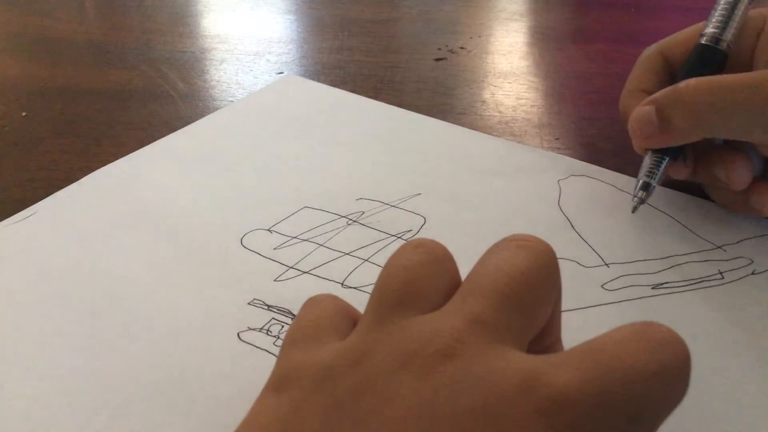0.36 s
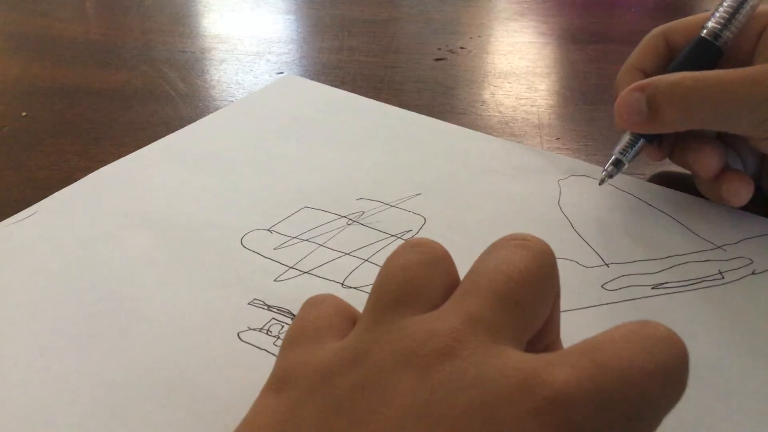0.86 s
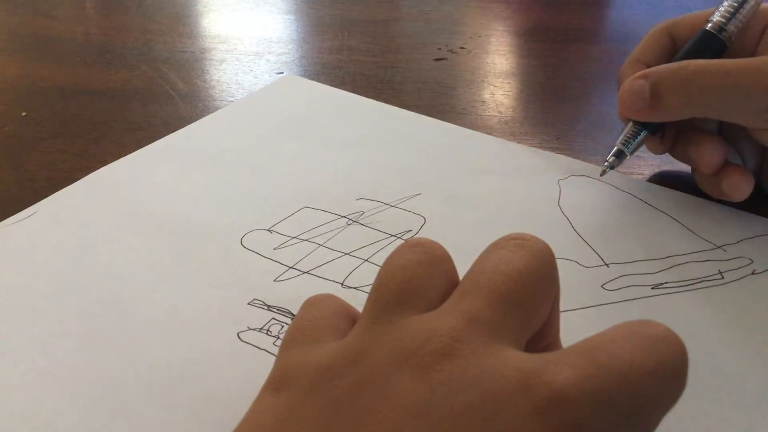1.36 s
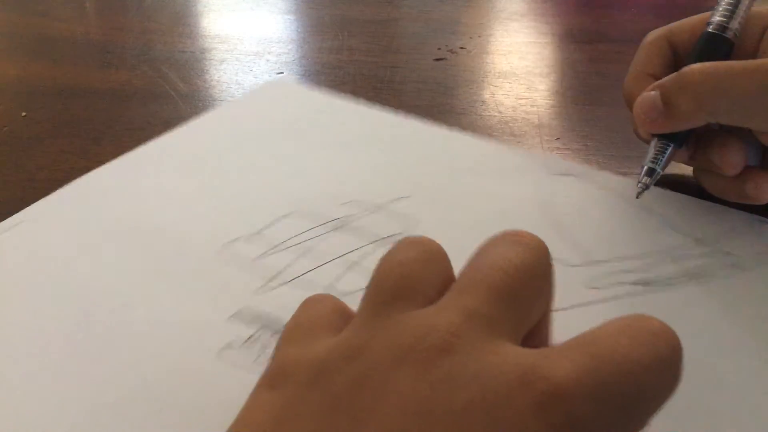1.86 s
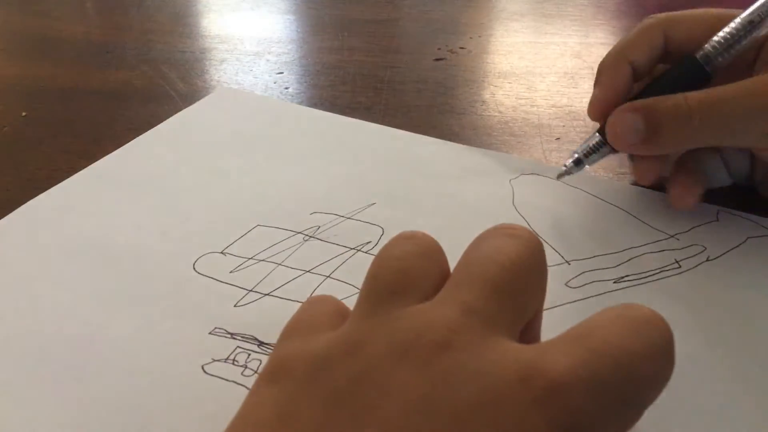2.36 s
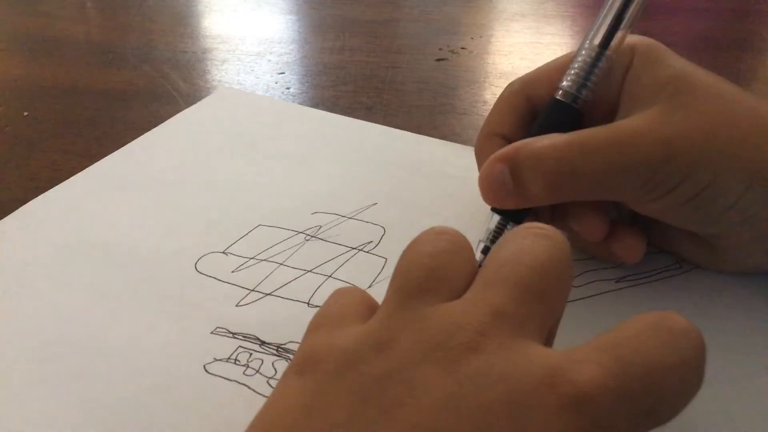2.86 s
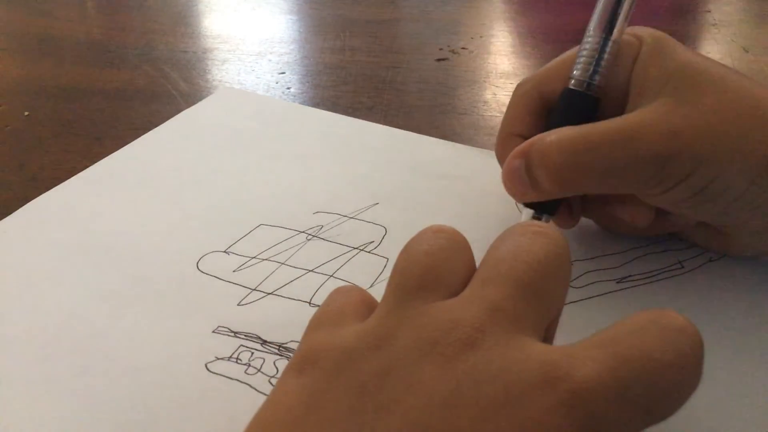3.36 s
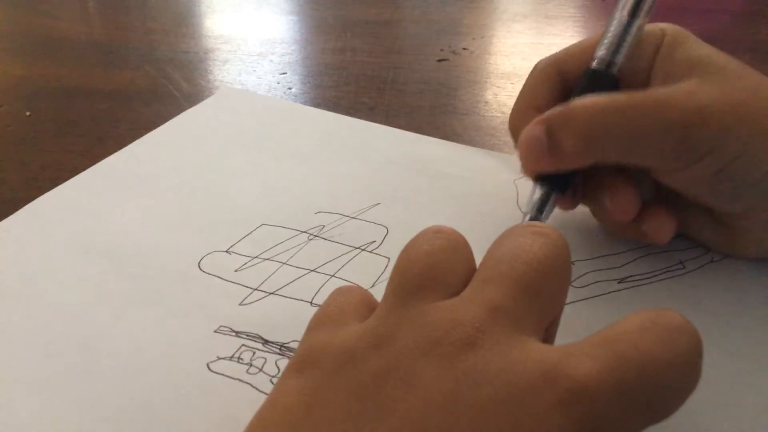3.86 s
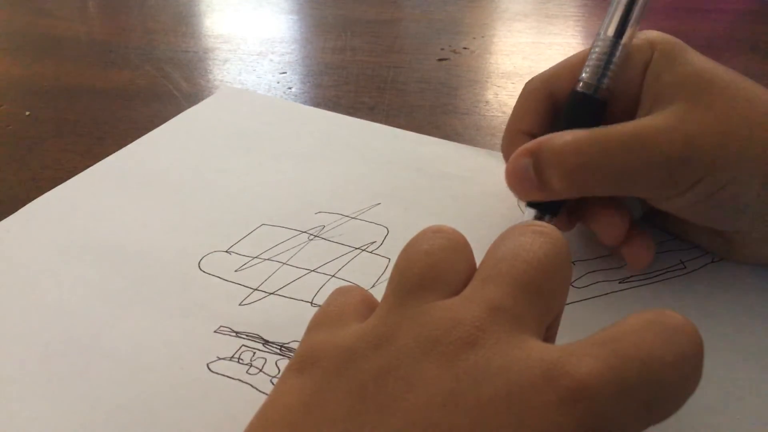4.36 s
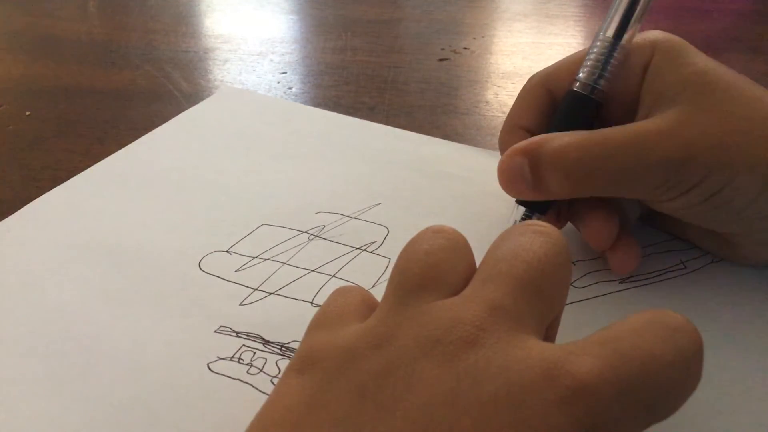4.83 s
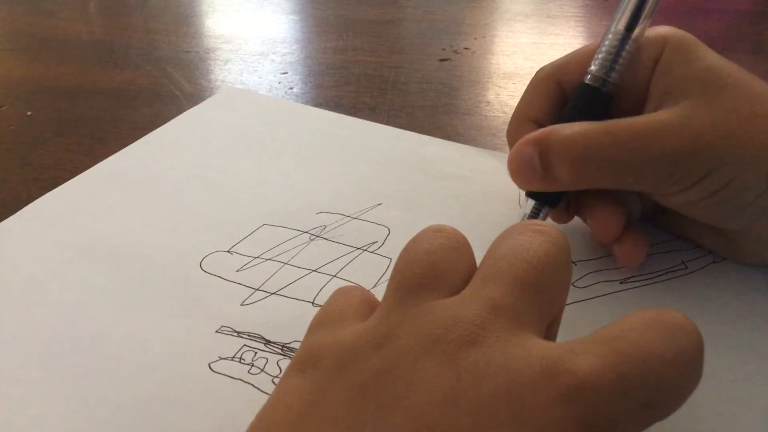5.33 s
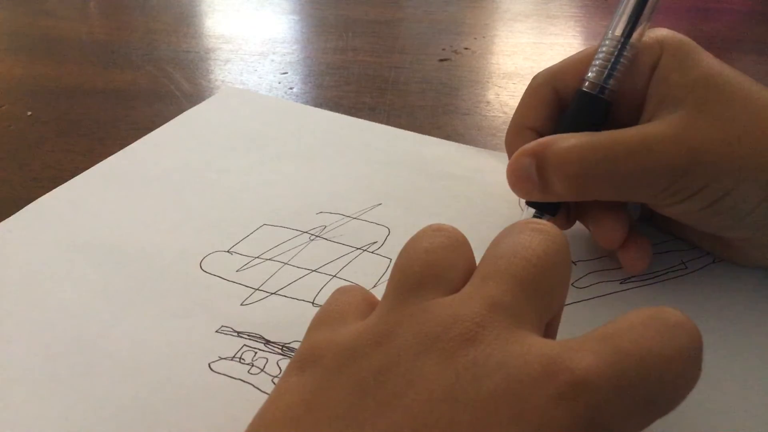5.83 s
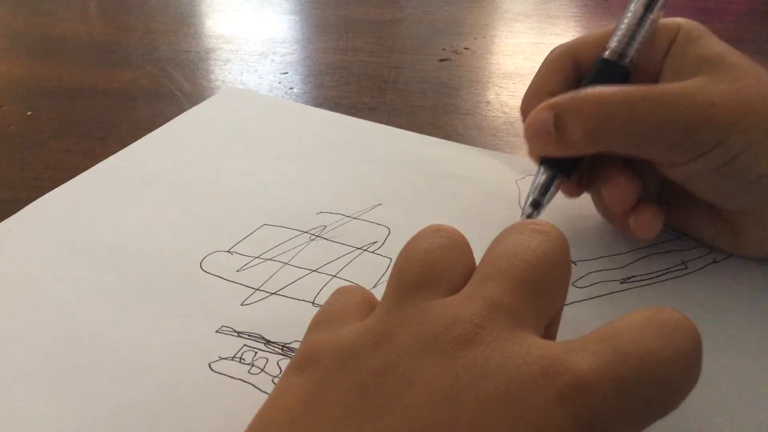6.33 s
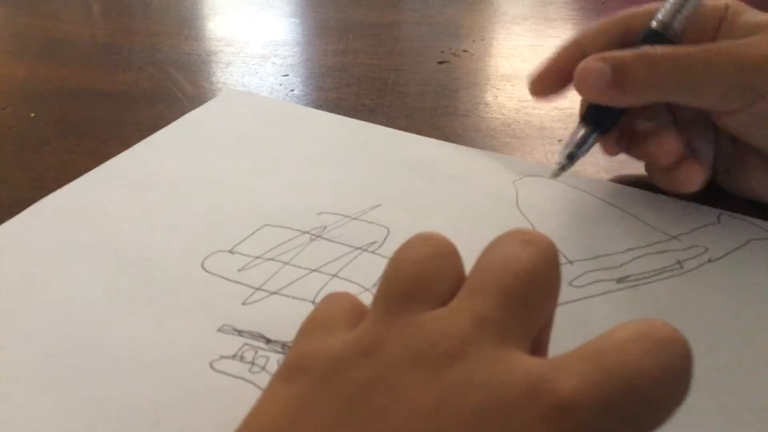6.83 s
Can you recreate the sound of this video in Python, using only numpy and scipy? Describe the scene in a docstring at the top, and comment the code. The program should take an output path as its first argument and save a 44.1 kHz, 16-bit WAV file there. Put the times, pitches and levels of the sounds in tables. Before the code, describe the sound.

Dull table thuds and an echoing hard clatter give way to sparse paper crackles, ending in a rapid run of scratchy pen strokes over quiet hiss.

```python
"""A ballpoint pen draws on paper over a hard wooden table; its quick strokes chatter at the end, as slipping noise
coloured by the microphone port. Pen and hands tap and rub the table top: knocks and noise wake its low modes. Paper
scratches and crackles as grainy noise and short clicks. Something hard clatters across the room, with echoes.
Under the still air of the room, a small camera on the table hisses through its port and ticks ten times a second."""
import sys
import numpy as np
from scipy import signal
from scipy.fft import rfft, irfft, next_fast_len
from scipy.io import wavfile
from scipy.ndimage import map_coordinates

SR = 44100
rng = np.random.default_rng(int(sys.argv[2]) if len(sys.argv) > 2 else 0)


def master(y):
    """Save y as 16-bit WAV."""
    cut = np.clip(np.atleast_2d(y).T, -1, 1)
    pcm = np.round(cut * 32767)  # scale
    wavfile.write(sys.argv[1], SR, pcm.astype(np.int16))


def linear_from_db(decibels):
    """Turn decibels (scalar or array-like) into linear amplitude factors; 0 gives 1."""
    return 10 ** (np.asarray(decibels, float) / 20)


N = 317520  # length in samples
T = np.arange(N) / SR  # time in seconds

# ways the table top rings: f/Hz, level/dB, free time to die away by 60 dB/s
TABLE_MODES = [(61.65, 6, 0.56), (83, -14.5, 0.097), (123.2, 4.5, 0.18), (179.7, -3, 0.37), (229, 3.5, 0.3),
               (273.7, 4, 0.066), (298, 3.5, 0.11), (365, -22, 0.33), (417, -13, 0.16), (571, -8.5, 0.071)]
# taps on the table; the spot touched sets how the two lowest modes answer:
# t/s, level/dB, deepest mode/dB, second mode/dB, hardness/dB
TABLE_TAPS = [(0.024, -54, 2.5, 18, 6), (0.387, -39, -8, -1, -3.5), (0.684, -31, -8, -5, -16),
              (0.708, -21, -17, -25, -14.5), (0.727, -29, -13, -12, -7), (0.737, -21, -19, -7.5, -16),
              (0.769, -26.5, -18, -12, -26), (0.798, -39.5, -12, 12, -16), (0.955, -25.5, 2, -2, -20),
              (1.014, -30.5, 10.5, 23.5, -24), (1.269, -30, -3.5, -2.5, -1), (1.924, -35.5, -12, 5.5, -16),
              (1.949, -34, -11, -20, -25), (2.1, -47.5, -1, -16, 2), (2.313, -34.5, -1, 11, -4),
              (2.344, -43, -7, 24.5, -4), (2.601, -38.5, 11, 13, -12), (2.668, -44.5, -22, 0, -21),
              (2.769, -51, 12, 14.5, -2), (3.01, -48, -2, -14, 0), (3.102, -36, -3, -5, -2),
              (3.345, -53, 9, 23, -10), (3.567, -50, 11, 6, 5), (4.042, -48, -3, -7, -6),
              (4.209, -36, 2, -0.5, -1), (4.599, -61.5, 18, 22, 3), (4.852, -31.5, -2, -0.5, -0.5),
              (5.118, -35.5, 0, 2, -2.5), (5.545, -44.5, -7, -14, -5), (6.749, -47.5, 13, 10, -6),
              (6.863, -49, 3, 14, -4), (6.925, -43.5, 18, 13, -4), (6.997, -44, 17, 25.5, -9),
              (7.022, -44, 20, 22, -7), (7.105, -47, 23, 27, 3), (7.159, -42, 14, 23, -1)]
# the tap that follows each stroke: level against the stroke/dB, deepest mode/dB, second mode/dB, hardness/dB
STROKE_TAP = (-4.5, 5.5, 9, -7)
# hands rubbing the top: t/s, level/dB, lean towards the deepest mode/dB
HAND_RUBS = [(0.0, -66, 0), (0.14, -54, 3.5), (0.64, -57, -1), (0.74, -53, -14), (0.92, -56, -1),
             (1.06, -43.5, 5), (1.2, -57, 1.5), (1.38, -54.5, -1), (1.98, -60.5, 5), (2.19, -54, -5),
             (2.49, -54, 4.5), (2.69, -52.5, -9), (2.83, -69, 10), (3.05, -61, -0.5), (3.19, -55.5, 1),
             (3.59, -51.5, -2.5), (3.83, -53.5, 3), (4.11, -68, -4), (4.31, -55.5, -2), (5.21, -68.5, 6.5),
             (5.47, -62, 0), (5.73, -55, 1), (6.38, -57.5, 0.5), (6.8, -47, -2), (6.96, -44.5, -2),
             (7.2, -44.5, 3)]
# faint paper movement between the scrapes: t/s, scratch level/dB, hiss against the scratch/dB
PAPER_SLIDE = [(0, -60.5, -8.5), (0.4, -70, -4), (0.75, -67.5, -8.5), (1.1, -69.5, -0.5),
               (1.9, -69.5, -3.5), (2.4, -65.5, -6.5), (3, -71.5, -1), (3.4, -74, -4), (3.95, -74, -1),
               (5.5, -77, 1), (6.2, -74, -0.5), (6.6, -70, 0), (7.2, -69, -4.5)]
# longer scrapes, which swell and stop short:
# t/s, length/s, scratch level/dB, hiss against the scratch/dB, table level/dB
LONG_SCRAPES = [(0, 0.094, -65.5, -20, -63.5), (0.49, 0.097, -76, -20, -79), (0.647, 0.15, -68, -12, -49.5),
                (1.953, 0.077, -73, -4, -56.5), (2.486, 0.27, -69, -7.5, -57.5),
                (3.245, 0.13, -58.5, -13.5, -63), (3.502, 0.18, -69.5, -6, -65.5),
                (4.236, 0.27, -71.5, -11.5, -56), (6.973, 0.07, -69.5, -10, -50.5)]
# lower colour of the dragged paper: f/Hz, level per Hz/dB
SCRATCH_COLOUR = [(240, -25), (400, -2), (454, -3.5), (930, -15), (1050, -10.5), (1280, -12), (2010, -30.5),
                  (3500, -42), (4550, -64), (7700, -120)]
# bright hiss of the paper fibres: f/Hz, level per Hz/dB
FIBRE_COLOUR = [(1200, -7), (2000, -7.5), (3150, -4.5), (4100, -12), (6000, -12), (8000, -13),
                (11500, -10.5), (14000, -26), (17000, -45)]
# the clearest paper crackles: t/s, level/dB
CLEAR_CRACKLES = [(2.015, -56), (2.5223, -49), (2.594, -49.5), (3.112, -53), (3.2104, -53), (3.269, -52),
                  (3.4271, -52), (3.535, -52), (3.5544, -54), (3.6326, -56), (3.8037, -55), (4.37, -57),
                  (4.4605, -58), (4.8906, -57), (6.8148, -52), (6.843, -48), (7.0093, -42), (7.0379, -55),
                  (7.069, -51)]
# still air of the room: f/Hz, level per Hz/dB
AIR_COLOUR = [(88, -37), (150, -2), (362, 2.5), (421, -19), (655, -6), (825, -23.5), (1860, -48.5),
              (2400, -36), (3120, -42), (5280, -120)]
# camera hiss with the resonances of the microphone port: f/Hz, level per Hz/dB
HISS_COLOUR = [(1180, -44), (2000, -8), (2260, -39), (2400, 1), (2880, 4), (3640, -13.5), (4110, -12),
               (4690, -6), (7170, -27.5), (9480, 2.5), (10200, -35), (11300, 1.5), (12800, -19),
               (14000, -2.5), (16000, -12)]
# hard knocks, far ones with much echo: t/s, level/dB, thud/dB, snap/dB, echo/dB
HARD_KNOCKS = [(1.2495, -42, 11, 6.5, 5), (1.2676, -31, 10.5, 7.5, -6.5), (1.2919, -35.5, 1, 5, -2),
               (1.313, -40, 0, 2.5, -7), (1.372, -32.5, -1, -12, -7.5), (1.3875, -43.5, -6, -19, -3),
               (1.439, -50.5, 10.5, -11, 0), (1.579, -49.5, 9, -4.5, 2), (1.5922, -37, 0.5, -34, -10),
               (1.6774, -36.5, -4.5, -14, -6.5), (1.711, -54, -8, 4, -5), (1.768, -50.5, 8, -28, -5.5),
               (2.2731, -46.5, -11, -1, -24), (2.3144, -48, 13, -23, 1.5), (2.3297, -35.5, 9.5, -32, -26),
               (2.489, -51, 4, -14, -19), (2.595, -47.5, 1, -4, -12), (4.03, -58, 12, 1.5, -4)]
# resonant colour of the hard knocks, as the microphone port hears them: f/Hz, width/Hz, level/dB
KNOCK_RESONANCES = [(255, 110, -3), (408, 54, -2), (564, 88, 2), (744, 370, -5), (1150, 150, -1),
                    (1505, 180, -7.5), (1756, 64, -5), (2450, 370, -8.5), (3120, 267, -8.5),
                    (3860, 590, -25.5), (5070, 860, -25.5), (6250, 1100, -34.5)]
# the room's echo: f/Hz, time to die away by 60 dB/s
ROOM_DECAY = [(200, 0.61), (1000, 0.74), (3000, 0.69), (8000, 0.6)]
# quick pen strokes: t/s, level/dB, length/s
PEN_STROKES = [(5.614, -58.5, 0.034), (5.656, -53.5, 0.014), (5.697, -52, 0.018), (5.734, -53.5, 0.035),
               (5.792, -47, 0.026), (5.866, -49, 0.031), (5.9444, -47.5, 0.032), (5.9725, -59.5, 0.079),
               (6.019, -48, 0.067), (6.104, -51, 0.037), (6.123, -56, 0.037), (6.19, -48, 0.045),
               (6.2676, -46, 0.048), (6.3583, -46, 0.047), (6.438, -48, 0.062), (6.543, -46.5, 0.047),
               (6.6368, -47.5, 0.056), (6.738, -46, 0.046), (6.8135, -41.5, 0.051), (6.9136, -45, 0.061),
               (6.9866, -47.5, 0.062), (7.092, -43.5, 0.043), (7.1413, -48, 0.035), (7.176, -45.5, 0.022)]
# resonant colour of the stroke noise at the microphone port: f/Hz, width/Hz, level/dB
STROKE_RESONANCES = [(600.4, 29, -7), (1143, 47, 2.5), (1332, 109, -4), (1788, 57, -12.5),
                     (2250, 370, -21.5), (3090, 130, -13.5)]


def unit(x):
    """Scales a sound to an rms (average strength) of 1."""
    return x / np.sqrt(np.mean(x ** 2) + 1e-20)


def along(points, hz):
    """Reads a curve of (Hz, value) points, with pitch on a log axis."""
    f, v = np.transpose(points)
    return np.interp(np.log(hz + 1), np.log(f + 1), v)


def curves(rows):
    """Draws one value per sample for each column after the time."""
    s, *columns = np.transpose(rows)
    return [np.interp(T, s, column) for column in columns]


def wobble(rate):
    """Makes a smooth random curve with `rate` random points a second."""
    return map_coordinates(rng.standard_normal(int(N * rate / SR) + 4), [T * rate])


def filtered(x, response):
    """Filters x by a response given as a function of frequency."""
    m = next_fast_len(len(x) + SR // 2)
    return irfft(rfft(x, m) * response(np.fft.rfftfreq(m, 1 / SR)), m)[:len(x)]


def resonances(modes):
    """Sums resonances (Hz, width Hz, dB), with every other one turned upside down."""
    def response(f):
        total = 0
        for k, (center, width, db) in enumerate(modes):
            peak = 1j * f * width / (center ** 2 - f ** 2 + 1j * f * width)
            total = total + (-1) ** k * linear_from_db(db) * peak
        return total
    return response


def grainy(spectrum, spike_db):
    """Makes coloured noise of rms 1 whose samples are now and then much larger."""
    grit = rng.standard_normal(N) * linear_from_db(spike_db * wobble(900))
    return unit(filtered(grit, lambda hz: linear_from_db(along(spectrum, hz))))


def add(track, s, sound):
    """Mixes a sound into the track at s seconds."""
    part = track[round(s * SR):][:len(sound)]
    part += sound[:len(part)]


def drag():
    """Rubbing shakes the table's modes without pause, and the paper scratches under the hand."""
    swell, stop_s = 0.32, 0.0058  # share of a scrape spent rising; time to stop
    rub_db, lean_db = curves(HAND_RUBS)
    slide_db, slide_hiss_db = curves(PAPER_SLIDE)
    start, length, scrape_db, hiss_db, table_db = np.transpose(LONG_SCRAPES)
    t = T[:, None] - start
    rise = np.clip(t / (swell * length), 0, 1)
    shape = rise * np.exp(-np.maximum(t - length, 0) / stop_s)

    # a mode that dies away sooner is wider
    modes = [(hz, 3.729 / t60, db) for hz, db, t60 in TABLE_MODES]
    groups = modes[:2], modes[2:3], modes[3:]
    force = rng.standard_normal((3, N)) * linear_from_db(1.8 * wobble(40))  # judder of skin on paper
    shake = []
    for push, group in zip(force, groups):
        ring = resonances(group)
        shake.append(unit(filtered(push, lambda hz: ring(hz) / (1 + 1j * hz / 400) ** 2)))
    deep, second, upper = shake
    table = linear_from_db(rub_db + 2 + lean_db) * deep
    table += linear_from_db(rub_db - 1.5 - lean_db) * second
    table += linear_from_db(rub_db - 12) * upper
    table += shape @ linear_from_db(table_db) * (upper + 0.55 * second)

    scratch = linear_from_db(slide_db) + shape @ linear_from_db(scrape_db)
    hiss = linear_from_db(slide_db + slide_hiss_db) + shape @ linear_from_db(scrape_db + hiss_db)
    paper = scratch * grainy(SCRATCH_COLOUR, spike_db=1.5) + hiss * grainy(FIBRE_COLOUR, spike_db=2.5)
    stutter = linear_from_db(1.2 * wobble(45))
    return table + stutter * paper


def still_air():
    """The air of the room is soft, dull noise whose level drifts slowly."""
    return linear_from_db(-66.5 + 0.67 * wobble(3.23)) * grainy(AIR_COLOUR, spike_db=-2.5)


def camera():
    """Hiss coloured by the port; its two strong treble bands flicker fast; it swells in each short tick."""
    since_tick = (T - 0.0785) % (1 / 10)  # seconds
    tick = 1 + 2.1 * np.exp(-since_tick / 0.0017)
    # the body flickers a little, the treble a lot
    flicker = linear_from_db(np.array([[0.8], [3.8]]) * wobble(250) + 0.29 * wobble(5.8))

    def treble_share(hz):
        return 1 / (1 + (8200 / (hz + 1)) ** 12) / (1 + (hz / 12600) ** 16)

    body, treble = rng.standard_normal((2, N)) * flicker * tick
    body = filtered(body, lambda hz: linear_from_db(along(HISS_COLOUR, hz)) * np.sqrt(1 - treble_share(hz)))
    treble = filtered(treble, lambda hz: linear_from_db(along(HISS_COLOUR, hz)) * np.sqrt(treble_share(hz)))
    return linear_from_db(-74) * unit(body + treble)


def taps():
    """Each tap starts all modes of the top together; a resting hand shortens their ring."""
    damped = 0.77  # share of the free ring time left under resting hands
    scatter_db = 2  # no two taps wake the modes alike
    out, clicks, t = np.zeros(N), np.zeros(N), T[:SR // 2]
    hz, mode_db, t60 = np.transpose(TABLE_MODES)[:, :, None]
    # bending waves arrive spread out, low ones swell slowly
    swell = 1 - np.exp(-(t * hz * 1.55 * (hz / 230) ** 0.22) ** 2)
    swing = np.sin(2 * np.pi * hz * (t + 0.00609)) * swell
    ring = swing * linear_from_db(mode_db - 60 * t / (damped * t60))

    # every quick stroke also taps the table 11 ms later
    level_db, *tap_colour = STROKE_TAP
    blows = TABLE_TAPS + [(s + 0.011, db + level_db, *tap_colour) for s, db, _ in PEN_STROKES]
    for s, db, deep_db, second_db, hard_db in blows:
        spot = [(65, deep_db), (121, second_db), (170, 0), (330, 0.0039), (600, 0.93 * hard_db)]
        luck_db = scatter_db * rng.standard_normal(len(TABLE_MODES))
        add(out, s + 0.0007, linear_from_db(db - 5.5 + along(spot, hz[:, 0]) + luck_db) @ ring)
        click = rng.standard_normal(800) * linear_from_db(db + hard_db - 60 * t[:800] / 0.098)
        add(clicks, s + 0.00161, click)

    def dull(hz):
        return 1j * hz / 500 / (1 + 1j * hz / 500) / (1 + 1j * hz / 1250) ** 3

    # the contact itself: a short burst of dull noise
    return out + filtered(clicks, dull)


def crackles():
    """A fibre snaps: a click of a cycle or two around its own pitch; louder snaps are brighter."""
    out, t = np.zeros(N), T[:300]
    hiss_db = sum(curves(PAPER_SLIDE))
    # faint chance crackles follow the paper hiss of the moment
    faint = [(s, hiss_db[int(s * SR)] + 8.5) for s in rng.uniform(0, N / SR, size=30)]
    for s, db in CLEAR_CRACKLES + faint:
        usual_hz = max(4900 + 150 * (db + 55.5), 4200)
        hz = usual_hz * linear_from_db(rng.normal(0, 0.97))
        ring = resonances([(hz, hz * 0.9, 0)])
        snap = rng.standard_normal(len(t)) * linear_from_db(-60 * t / 0.0085)
        add(out, s, linear_from_db(db + 1) * filtered(snap, lambda f: ring(f) ** 2))
    return out


def room(x):
    """Echoes x with a fresh noise tail; each frequency dies at its own speed."""
    hz, t, z = signal.stft(rng.standard_normal(SR * 3 // 4), SR, nperseg=256)
    fade = linear_from_db(-60 * t / along(ROOM_DECAY, hz)[:, None])
    tail = signal.istft(z * fade, SR, nperseg=256)[1]
    later = np.pad(x, (300, 0))  # the echo starts 300 samples late
    return signal.fftconvolve(later, tail / np.linalg.norm(tail))


def clatter():
    """Short rattling blows, coloured by the microphone port, each with its own echo from the walls."""
    rattle_s = 0.015  # length of one knock
    out, t = np.zeros(N), T[:SR // 8] - 0.005
    for s, db, thud_db, snap_db, echo_db in HARD_KNOCKS:
        port = resonances([(hz, width, level + rng.normal(0, 1.5)) for hz, width, level in KNOCK_RESONANCES])
        tilt = [(500, thud_db), (1300, 0), (2600, snap_db - 3), (7500, snap_db), (13000, snap_db - 26)]
        # uneven contacts: the strength jumps every 60 samples
        uneven = np.repeat(rng.standard_normal(len(t)), 60)[:len(t)]
        grit = rng.standard_normal(len(t)) * linear_from_db(3.5 * uneven)
        fade = linear_from_db(-8 * t / rattle_s) / (1 + (t / rattle_s) ** 6)
        rattle = unit(grit) * np.clip(t / 0.0019, 0, 1) * fade
        blow = linear_from_db(db + 13) * filtered(rattle, lambda hz: linear_from_db(along(tilt, hz)) * port(hz))
        add(out, s - 0.0055, blow)
        add(out, s - 0.0055, linear_from_db(echo_db) * room(blow))
    return out


def strokes():
    """The ball bites at once, then slips about seventy times a second until it lifts."""
    out, t = np.zeros(N), T[:SR // 8]
    port = resonances(STROKE_RESONANCES)
    for s, db, length in PEN_STROKES:
        # the low resonance grows fuller as the strokes go on, the high ones a little
        since_first = s - PEN_STROKES[0][0]
        low_db, high_db = 5 + 7 * since_first, -1.5 + 3 * since_first
        tilt = [(600, low_db), (1000, 0), (1500, 0), (2600, high_db), (3500, high_db - 0.6),
                (6000, high_db - 15)]
        slip = (t * 68 * linear_from_db(rng.normal(0, 2.2))) % 1  # how far through each slip, 0 to 1
        push = linear_from_db(-13 * slip - 7 * t / length) / (1 + (t / length) ** 8)
        force = push * rng.standard_normal(len(t))
        force[40] += 7  # the bite
        sound = filtered(force, lambda hz: linear_from_db(along(tilt, hz)) * port(hz))
        add(out, s - 0.001, linear_from_db(db + 15) * sound)
    return out


def scene():
    """Adds up table, paper, pen, clatter, air and camera in one channel."""
    table_and_paper = drag() + taps() + crackles()
    mix = table_and_paper + strokes() + clatter() + still_air() + camera()
    return mix[None]


def low_pass(x):
    """Removes everything above the highest recorded frequency."""
    return signal.sosfilt(signal.butter(12, 16110, fs=SR, output="sos"), x)


def record(dry):
    """The microphone cuts the deepest bass."""
    # six gentle bass cuts at 39 Hz in a row
    mix = filtered(dry[0], lambda hz: (1j * hz / 39 / (1 + 1j * hz / 39)) ** 6)[None]
    return low_pass(mix)


dry = scene()
out = record(dry)
master(out)
```